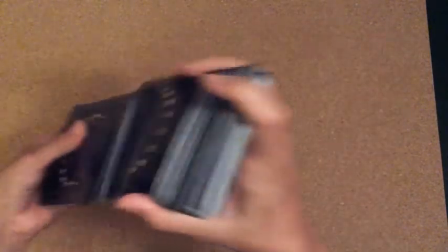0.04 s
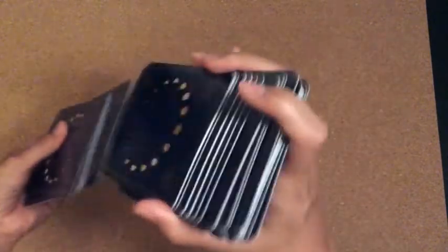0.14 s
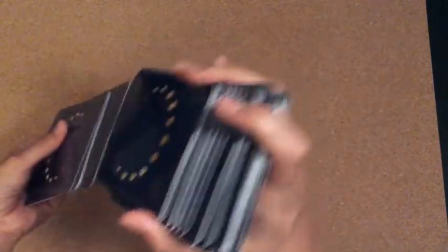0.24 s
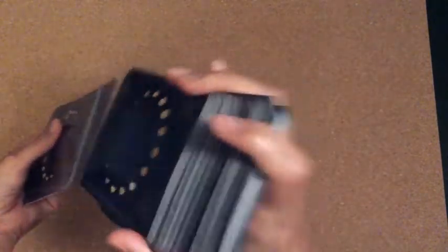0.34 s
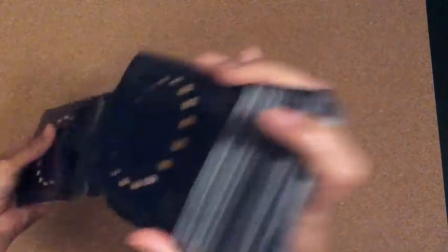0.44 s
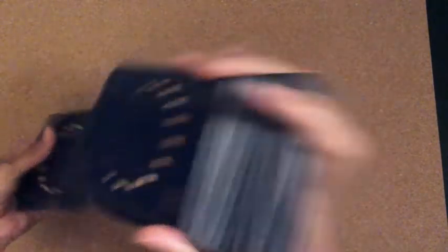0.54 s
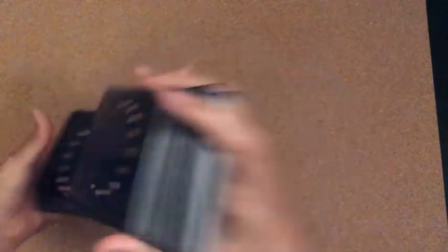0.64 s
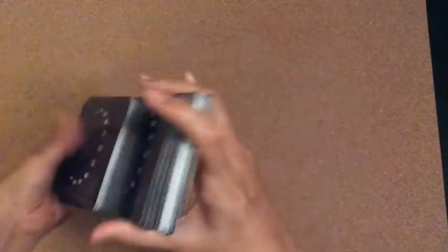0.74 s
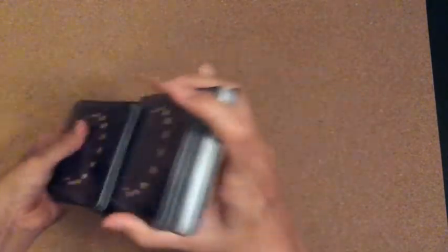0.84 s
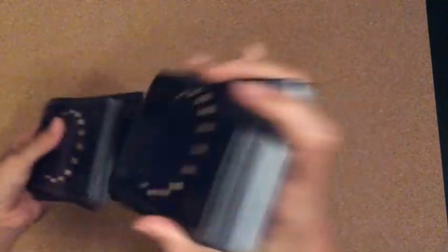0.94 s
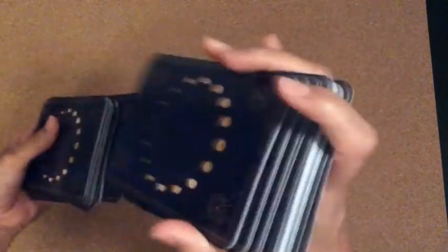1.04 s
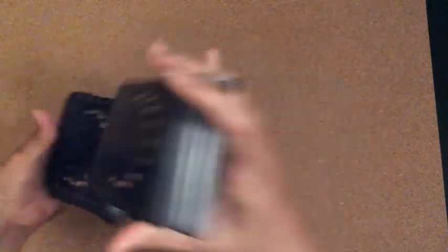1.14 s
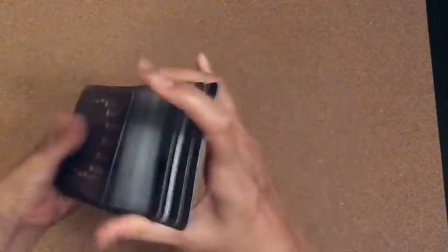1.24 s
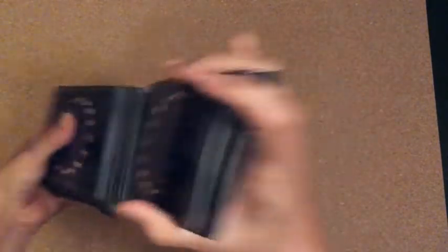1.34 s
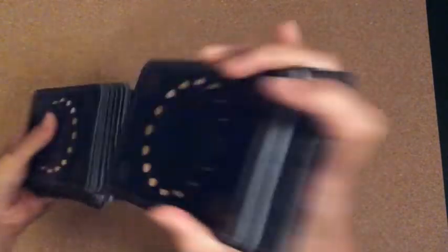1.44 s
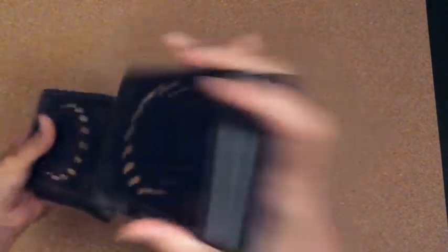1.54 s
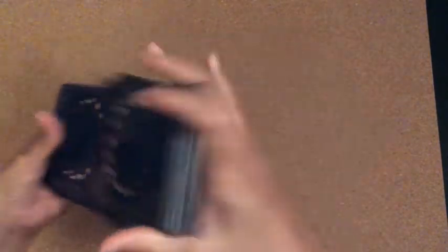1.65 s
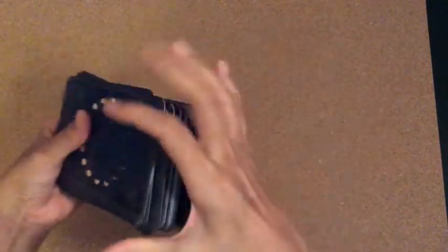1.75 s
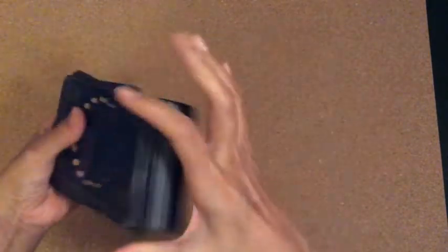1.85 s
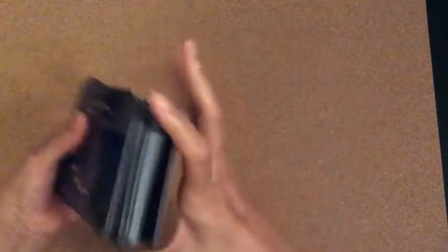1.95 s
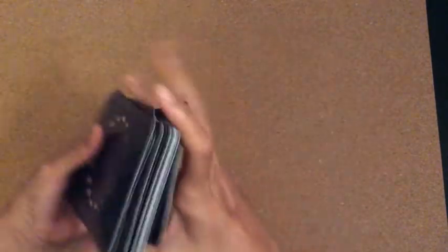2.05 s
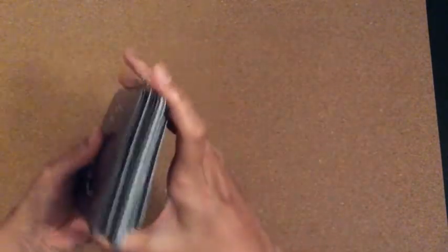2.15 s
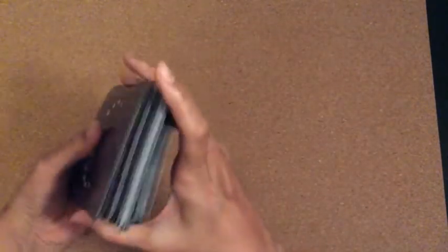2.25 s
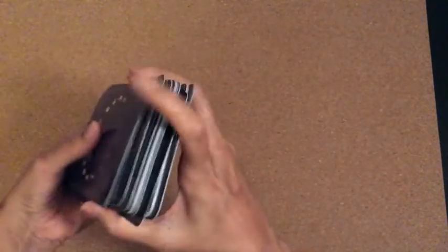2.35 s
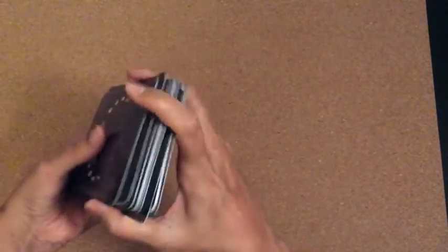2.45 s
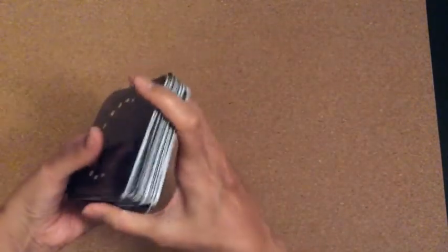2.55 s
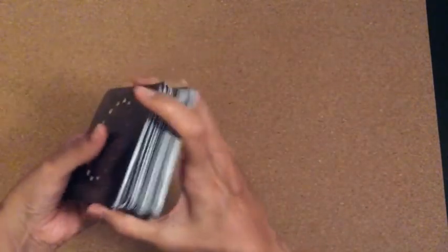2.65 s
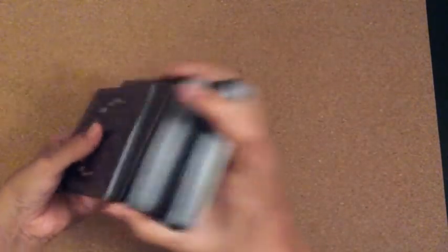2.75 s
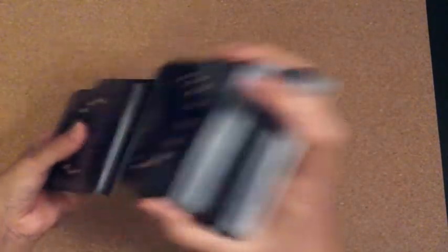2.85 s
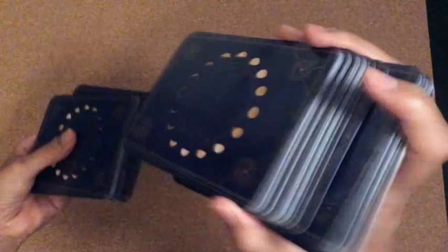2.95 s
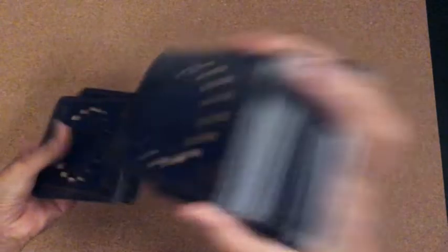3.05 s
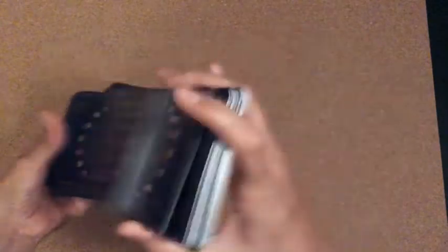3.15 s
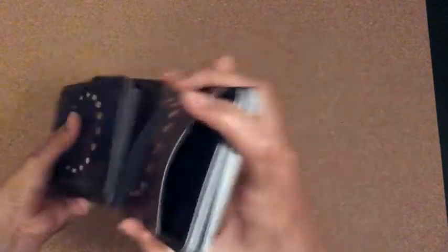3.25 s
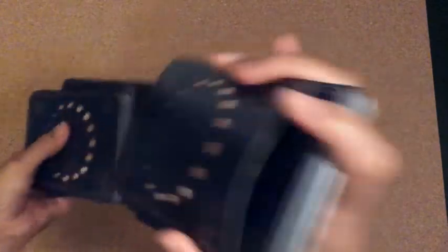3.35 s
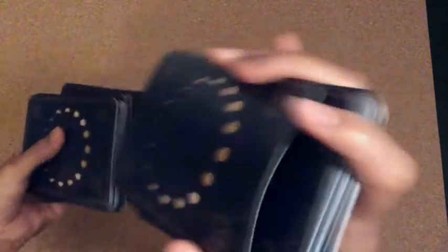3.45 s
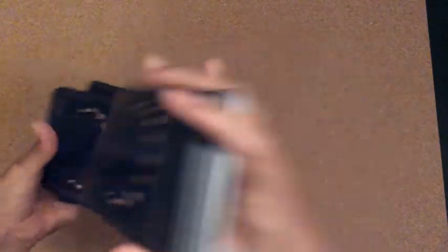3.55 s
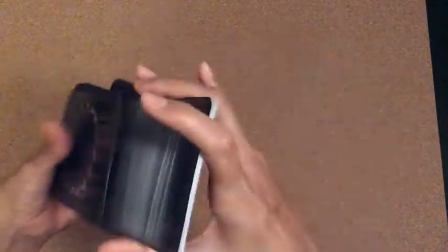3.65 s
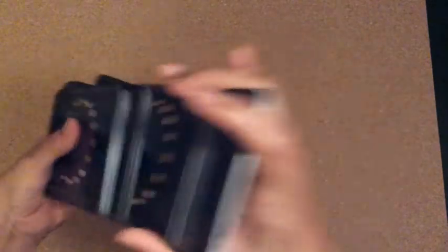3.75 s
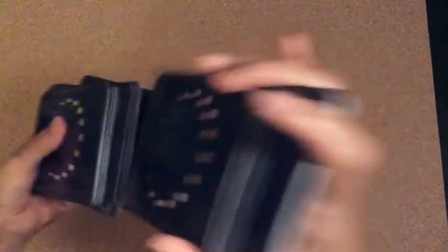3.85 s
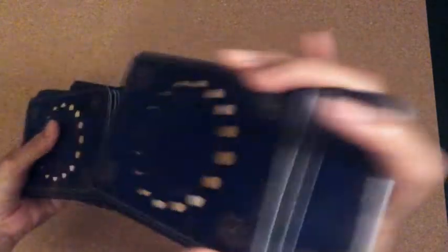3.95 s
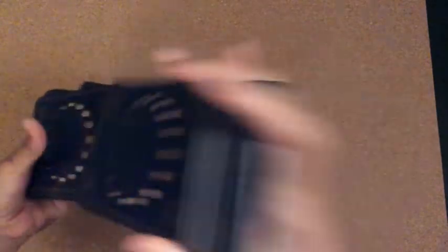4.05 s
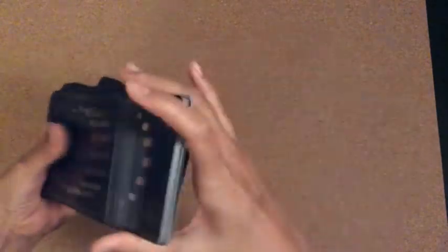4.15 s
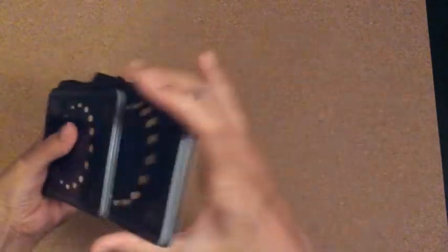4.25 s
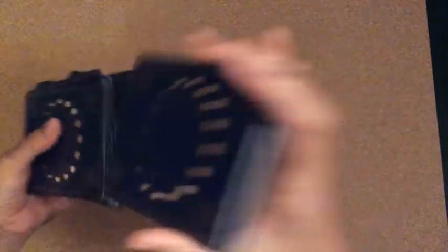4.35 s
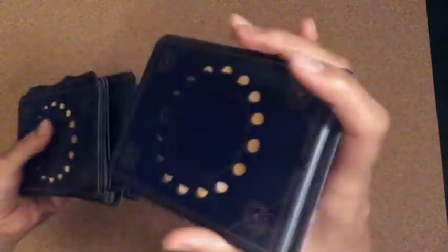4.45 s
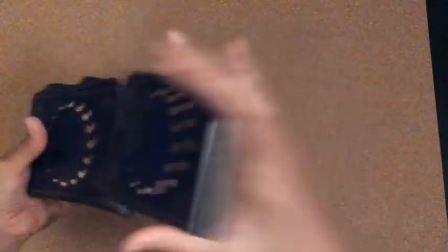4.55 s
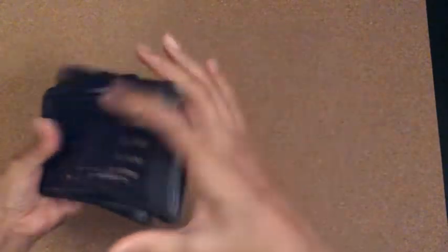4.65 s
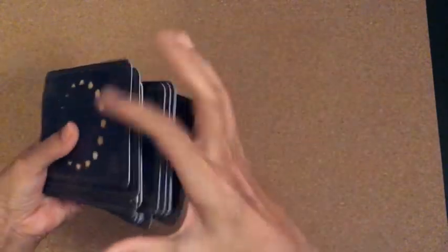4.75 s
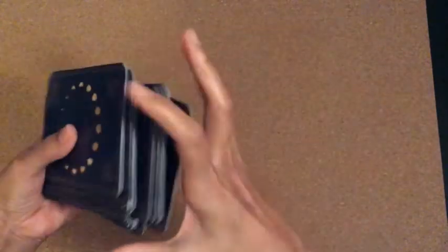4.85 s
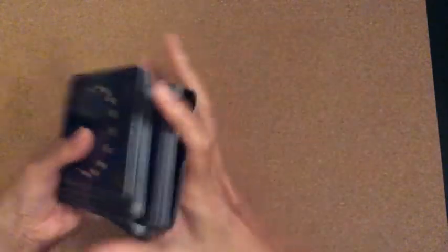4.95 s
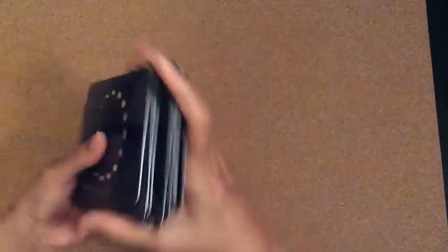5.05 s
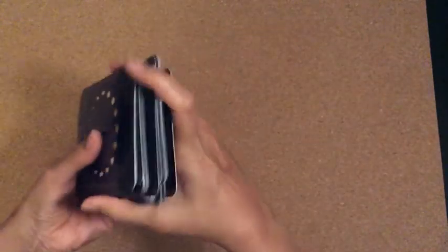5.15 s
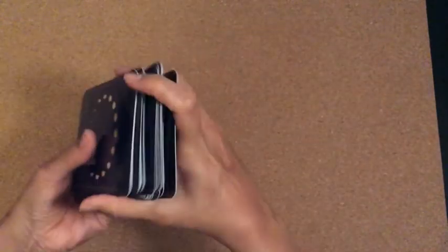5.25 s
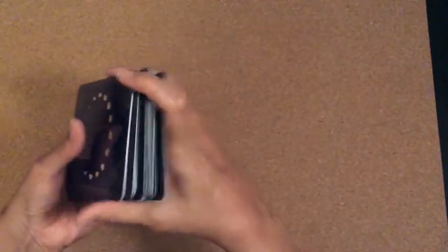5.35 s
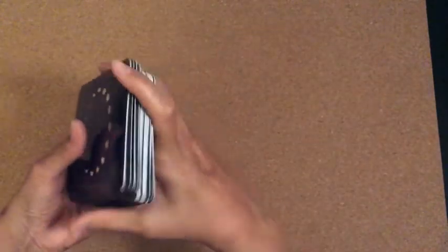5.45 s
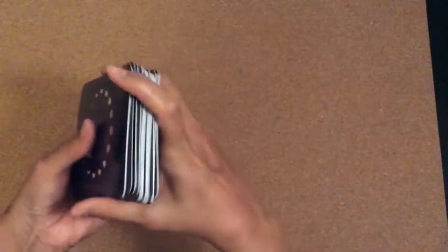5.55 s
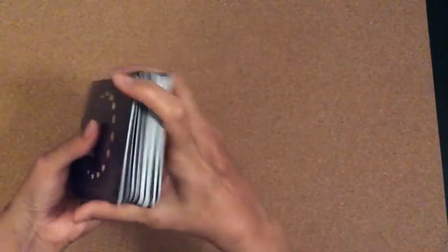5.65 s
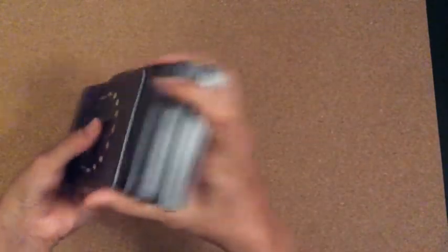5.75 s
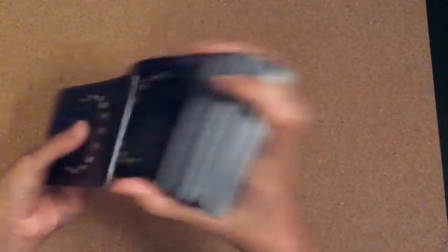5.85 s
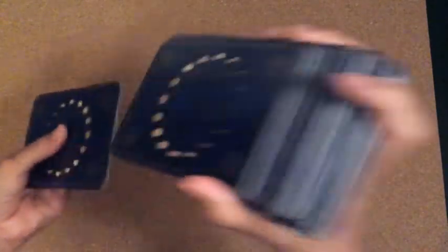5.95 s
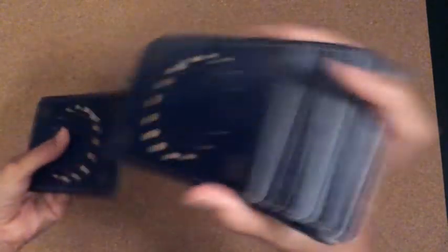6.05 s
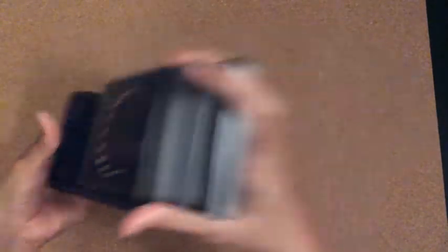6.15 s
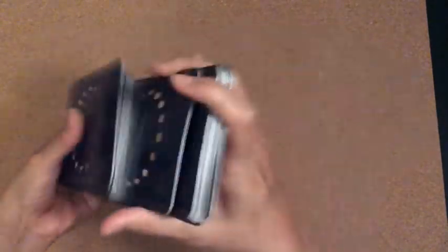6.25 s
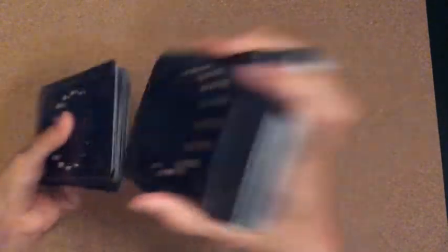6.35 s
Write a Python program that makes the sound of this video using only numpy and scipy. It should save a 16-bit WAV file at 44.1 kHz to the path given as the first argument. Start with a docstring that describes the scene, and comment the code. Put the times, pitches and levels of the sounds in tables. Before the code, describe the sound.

Two hands shuffle a deck of large glossy cards close to the microphone. Packets land in quick clusters of light slaps and edge clicks, with brief hisses as the faces slide and soft low puffs of air. The shuffling twice eases into faint rubbing and small ticks, then picks up again. The room is quiet, with a faint hiss and hum.

```python
"""Overhand card shuffle

A quiet room, a phone microphone close to two hands shuffling a deck of large glossy cards.
Packets slap and click edge on edge, their faces slide past each other with a hiss, and air
squeezed out between closing packets reaches the microphone as soft low pushes.
The walls answer briefly; under it all lie room tone and a faint mains hum."""
import sys
import numpy as np
from scipy import signal
from scipy.fft import rfft, irfft, next_fast_len
from scipy.io import wavfile
from scipy.ndimage import uniform_filter1d, map_coordinates

SR = 44100
rng = np.random.default_rng(int(sys.argv[2]) if len(sys.argv) > 2 else 0)


def store_wav(level_fs):
    """Save 16-bit WAV to argv[1]."""
    pcm = np.round(np.clip(np.atleast_2d(level_fs), -1, 1) * 32767)
    wavfile.write(sys.argv[1], SR, pcm.T.astype(np.int16))


N = 281799

# card contacts: (time [s], ring level [dB], ring [Hz], deck knock [dB re ring], edge click [dB re ring])
CONTACTS = [(0.028, -54.5, 5260, -7.5, -9), (0.067, -58, 5260, -34, -16), (0.374, -34.5, 2670, -4.5, -3),
            (0.7015, -31.5, 3930, -7.5, 2), (0.752, -35, 4100, -8.5, -23), (0.7587, -32.5, 2480, -12.5, -8),
            (0.773, -33.5, 2670, -23, 0), (0.778, -36, 2600, -26, -8), (0.7924, -38, 4500, -15, -2),
            (0.8038, -35.5, 4220, -11, 2), (0.8639, -48, 8200, -29, 13.5), (0.8672, -33, 1800, -14.5, 1),
            (0.8886, -48, 1040, -6, -3), (1.118, -63, 900, -3, -21), (1.1815, -56, 2680, 2, -5),
            (1.191, -42.5, 4560, -17, -6), (1.256, -36, 2620, -9.5, -18.5),
            (1.2624, -38, 2700, -12.5, -1.5), (1.2978, -30.5, 2050, -10.5, -1),
            (1.3585, -44, 2720, -13, -2), (1.393, -52.5, 1340, -6.5, 2.5), (1.608, -51, 4040, -5, 2.5),
            (1.6099, -25, 2580, -27.5, -4.5), (1.708, -47, 8100, -11.5, 2.5), (1.7289, -50.5, 970, -1, -1),
            (1.7659, -57, 1970, -10, -15), (1.799, -59, 2760, -11, 2), (2.0065, -68.5, 920, 6.5, 1),
            (2.0654, -61, 890, -19, 5.5), (2.3993, -57, 9000, -16, -9), (2.4754, -49, 2720, -30, -2),
            (2.4925, -51.5, 3870, -18, -3), (2.662, -35, 7260, -29, -6.5), (2.8937, -37.5, 1430, 0, -12.5),
            (3.0256, -68.5, 2450, -9.5, -4), (3.07, -64, 3420, -5, 7), (3.0855, -66, 4500, -23, 3),
            (3.1484, -40.5, 830, 0, 10.5), (3.1932, -44.5, 1660, 0, 7.5), (3.215, -38.5, 1650, -11, -4),
            (3.2228, -40, 1340, -6, -2), (3.269, -36, 3880, -6.5, 0), (3.2711, -35.5, 1160, -2, -1.5),
            (3.2789, -29, 3160, -31, -6.5), (3.2832, -29.5, 1630, -10.5, -20), (3.5963, -48, 2020, -6, 1.5),
            (3.607, -50.5, 2760, -3, 5), (3.648, -30, 3640, -11.5, -3), (3.682, -43, 1600, -10, 1),
            (3.7096, -56, 820, -1, -4), (3.8545, -48.5, 2510, -11, -4), (3.964, -58.5, 3500, -25, -6),
            (4.0886, -43, 5700, -23, 7), (4.1778, -43, 5070, -15.5, -2.5), (4.316, -55.5, 1920, 4.5, 4),
            (4.576, -31.5, 1860, -8.5, -5), (4.584, -43.5, 780, -14, -6), (4.6469, -43.5, 2300, -29, -4),
            (4.667, -47.5, 2170, -9, -1), (4.675, -38.5, 2400, -13, 1), (4.7592, -54, 3800, -15, -0.5),
            (4.7644, -51, 3800, -14, 0.5), (4.7793, -53, 1123, -1.5, 1), (4.9922, -59, 1060, -17, -5),
            (5.019, -58.5, 1140, -20, -18), (5.0975, -58.5, 1120, -24, 8), (5.216, -57, 3330, -20, -4.5),
            (5.241, -52.5, 654, -16, -18), (5.3934, -55, 5500, -20, 0.5), (5.4241, -54, 1000, -19, -0.5),
            (5.662, -53.5, 2900, -26, 3), (5.9089, -46.5, 2700, -3.5, -0.5), (6.049, -67, 2370, -17, 0),
            (6.1099, -60.5, 1900, -7, -5), (6.179, -49.5, 3980, -8, 2), (6.1926, -35.5, 6500, -19, 1),
            (6.2057, -33, 2170, -7, -10), (6.249, -41, 1820, -12, -14), (6.2587, -43, 1130, -4.5, -2),
            (6.307, -43.5, 814, -5.5, 1.5), (6.321, -44.5, 2240, -4, -9), (6.3524, -39, 980, -3.5, -4)]
# resonances of the hollow of deck and palms: (centre [Hz], width [Hz], gain [dB])
DECK_MODES = [(225, 100, -9), (435, 55, 0), (650, 100, -6), (920, 80, -4), (1230, 150, -10)]


def amp(db):
    return 10 ** (np.asarray(db) / 20)


def unit_rms(x, span=slice(None)):
    """x scaled to an rms of one within span."""
    return x / np.sqrt(np.mean(x[span] ** 2) + 1e-20)


def along(points, hz):
    """Interpolate (frequency [Hz], value) points on a log frequency axis."""
    freqs, values = np.transpose(points)
    return np.interp(np.log(hz + 1), np.log(freqs + 1), values)


def wobble(rate):
    """A smooth random curve, rate knots a second."""
    knots = rng.standard_normal(int(N * rate / SR) + 4)
    return map_coordinates(knots, [np.arange(N) * rate / SR])


def filtered(x, response):
    """x through a complex response given as a function of frequency."""
    n = x.shape[-1]
    size = next_fast_len(2 * n)
    return irfft(rfft(x, size) * response(np.fft.rfftfreq(size, 1 / SR)), size)[..., :n]


def resonances(modes, hz):
    """Causal response of (centre [Hz], width [Hz], gain [dB]) modes, alternating in sign."""
    return sum((-1) ** k * amp(db) * 1j * hz * width / (centre ** 2 - hz ** 2 + 1j * hz * width + 1e-9)
               for k, (centre, width, db) in enumerate(modes))


def patchy_noise(depth_db):
    """White noise whose gain drifts in patches of time and frequency."""
    spectrum = signal.stft(rng.standard_normal(N + 512), nperseg=256)[2]
    patches = uniform_filter1d(rng.standard_normal(spectrum.shape), size=9, axis=0)
    patches = uniform_filter1d(patches, size=7, axis=1)
    return signal.istft(spectrum * amp(depth_db * unit_rms(patches)), nperseg=256)[1][:N]


def swells(rows):
    """Gain of (time [s], hold [s], level [dB], 20 dB rise [s], 20 dB fall [s]) swells, added in power."""
    t, power = np.arange(N) / SR, np.zeros(N)
    for at, hold, db, rise, fall in rows:
        near = slice(max(round((at - 3 * rise) * SR), 0), round((at + hold + 3 * fall) * SR))
        drop_db = 20 * np.maximum((at - t[near]) / rise, (t[near] - at - hold) / fall).clip(0)
        power[near] += amp(db - drop_db) ** 2
    return np.sqrt(power)


def room_tone(air_db=-63):
    """The bed of the room: steady hiss over a low rumble that wavers, and a faint unsteady mains hum."""
    # room tone and microphone hiss: (frequency [Hz], relative density [dB])
    air_spectrum = [(4.7, -4), (8.0, 16.5), (24, -2.5), (66, -8), (97, -13), (358, -17), (794, -26.5),
                    (2940, -30), (8710, -35), (14500, -34.5), (16500, -75)]
    # mains hum in the room: (frequency [Hz], rms level [dB])
    hum_partials = [(49.5, -74.5), (150, -85.5)]
    noise, t = rng.standard_normal(N), np.arange(N) / SR
    rumble = filtered(noise, lambda hz: hz < 150)
    waver = rumble * (amp(1.4 * wobble(2.86)) - 1)
    air = filtered(noise + waver, lambda hz: amp(along(air_spectrum, hz)))
    hum = np.zeros(N)
    for hz, db in hum_partials:
        peak = np.sqrt(2) * amp(db + 2.9 * wobble(12))
        hum += peak * np.sin(2 * np.pi * hz * t + 0.59 * wobble(3.4))
    return amp(air_db) * unit_rms(air) + hum


def sliding_faces(settle_db=-8, settle_rise_s=0.0075, settle_fall_s=0.026):
    """Card faces rub: a grainy hiss, and a duller rustle through the hollow of the deck."""
    # strokes of face on face:
    # (time at full strength [s], hold [s], hiss [dB], rise [s], fall [s], rustle [dB re hiss])
    strokes = [(0.001, 0.063, -58.5, 0.13, 0.11, -12), (0.335, 0.014, -63, 0.06, 0.11, 2),
               (0.669, 0.018, -69, 0.068, .02, 4), (0.372, .003, -61.5, 0.0054, .1, 6.5),
               (0.705, 0.0031, -36.5, .004, .09, -16), (0.757, 0.029, -42.5, 0.072, 0.069, -15),
               (0.863, .004, -46, 0.0087, 0.062, -8.5), (1.055, 0.12, -76.5, 0.07, 0.061, -9),
               (1.186, 0.083, -46.5, 0.013, 0.024, -18), (1.302, 0.039, -51, 0.043, 0.095, -12.5),
               (1.609, 0.00417, -45, .006, 0.015, -1), (1.643, .02, -54, .05, 0.078, -16),
               (1.707, 0.0087, -46, 0.017, .022, -17), (1.767, 0.04, -69, .1, 0.032, -6),
               (1.997, 0.098, -64.5, .03, 0.13, -12), (2.215, 0.044, -63.5, 0.077, 0.31, -14.5),
               (2.445, 0.057, -56.5, 0.097, 0.028, -14.5), (2.635, 0.043, -58.5, 0.13, 0.15, -10.5),
               (2.796, 0.021, -58.5, 0.098, 0.16, -17), (2.893, .003, -58, 0.058, 0.0082, -4),
               (3.071, 0.01, -60, 0.0068, 0.023, -14), (3.149, 0.0037, -41.5, 0.0046, 0.12, -16),
               (3.191, 0.029, -47.5, 0.065, 0.025, -9.5), (3.268, 0.0087, -47, 0.009, 0.025, -1),
               (3.6, 0.034, -52, 0.037, .05, -11.5), (3.646, 0.0029, -43.5, 0.024, 0.066, -12.5),
               (3.758, 0.053, -61, 0.11, 0.049, -12), (3.854, 0.0034, -59, 0.017, 0.013, -0.5),
               (4.093, 0.0049, -52, 0.0045, 0.086, -12.5), (4.173, 0.017, -49.5, .055, 0.022, -13.5),
               (4.293, .04, -57.5, 0.12, .03, -9), (4.574, .004, -51.5, 0.0032, 0.13, -2),
               (4.655, 0.025, -56, 0.039, 0.063, -10), (4.76, 0.027, -67, .02, .04, -10),
               (4.927, 0.014, -65.5, 0.028, 0.068, -3), (5, 0.019, -64.5, 0.036, .13, -11),
               (5.092, 0.011, -64.5, 0.052, 0.026, -11), (5.161, 0.018, -63.5, .06, 0.11, -14),
               (5.232, 0.02, -61, 0.076, 0.07, -4), (5.368, 0.072, -59, 0.036, 0.033, -10),
               (5.49, 0.017, -67.5, .05, 0.44, -9.5), (5.655, 0.02, -52, 0.057, 0.031, -12),
               (5.773, 0.08, -55.5, 0.12, 0.069, -16), (5.903, 0.0036, -70, 0.04, 0.069, 2),
               (6.13, 0.056, -65.5, .03, 0.054, -12), (6.187, 0.035, -40.5, 0.0099, 0.067, -10.5),
               (6.31, 0.034, -50.5, .015, 0.027, -2)]
    hiss_gain = swells([row[:-1] for row in strokes])
    rustle_gain = swells([(at, hold, db + rustle_db, rise, fall)
                          for at, hold, db, rise, fall, rustle_db in strokes])
    # the deck also rustles as it settles after a knock
    settle_gain = swells([(at + settle_rise_s, 0, db + knock_db + settle_db, settle_rise_s, settle_fall_s)
                          for at, db, _, knock_db, _ in CONTACTS])
    # hiss of the glossy faces: (frequency [Hz], relative density [dB])
    hiss_spectrum = [(900, -28), (1500, -5.5), (2460, -1), (5300, -3), (7800, -2.5), (9300, -3.5),
                     (10800, -11.5), (14000, -9.5), (15500, -14.5)]
    stick_slip = wobble(90)
    grain = patchy_noise(depth_db=1.5) * amp(1.86 * stick_slip + 1.6 * wobble(570))
    hiss = filtered(grain, lambda hz: amp(along(hiss_spectrum, hz)))
    rub = patchy_noise(depth_db=5.8) * amp(1.4 * stick_slip)
    # a 600 Hz high-pass: rubbing stirs the upper hollows most
    rustle = filtered(rub, lambda hz: resonances(DECK_MODES, hz) * 1j * hz / (600 + 1j * hz))
    return hiss_gain * unit_rms(hiss) + (rustle_gain + settle_gain) * unit_rms(rustle)


def packet_taps(bend_hz=6000):
    """Each contact is a quick run of card edges landing: it rings the card, clicks, and knocks the deck."""
    # resonances of the card stock: (centre [Hz], width [Hz], gain [dB])
    stock_modes = [(1807, 140, -3), (2570, 410, 5), (3190, 2100, -0.5), (4360, 2000, 2), (5440, 1600, -6.5)]
    # click of a card edge: (frequency [Hz], relative density [dB])
    click_spectrum = [(2500, -8.5), (5000, -4.5), (8000, -2.5), (10500, -10), (15000, -13)]
    out, t = np.zeros(N + SR), np.arange(3000) / SR
    attack, knock_attack = slice(90), slice(300)  # levels are set over the first 2 ms and 7 ms
    leading_edge = np.exp(-((t - 0.0004) / 0.00002) ** 2)  # lands as one hard blow
    for at, db, ring_hz, knock_db, click_db in CONTACTS:
        t60 = 0.027 * amp(0.071 * (db + 41.5))  # harder contacts land more edges and last longer
        fade = amp(-60 * t / t60) * (1 - np.exp(-t / 0.000078))
        edges = rng.standard_normal((3, len(t)))
        force = amp(1.47 * rng.standard_normal(len(t)))  # some edges strike harder than others
        ring_drive, click_drive, knock_drive = edges * force * fade + [[5], [9], [14]] * leading_edge
        own_mode = [(ring_hz, 0.2 * ring_hz, 6)]
        ring = filtered(ring_drive, lambda hz: (resonances(own_mode, hz) + resonances(stock_modes, hz))
                        / (1 + 1j * hz / bend_hz) ** 2)  # the card bends on contact, dulling its ring
        click = filtered(click_drive, lambda hz: amp(along(click_spectrum, hz)))
        knock = filtered(knock_drive, lambda hz: resonances(DECK_MODES, hz))
        tap = (unit_rms(ring, attack) + amp(click_db) * unit_rms(click, attack)
               + amp(knock_db) * unit_rms(knock, knock_attack))
        start = round(at * SR) - 20
        out[start:start + len(t)] += amp(db) * tap
    return out[:N]


def air_pushes():
    """Closing packets squeeze air at the microphone: a brief swing of pressure under a smooth swell."""
    # puffs of air: (time [s], swell peak [dB], frequency [Hz])
    puffs = [(0.034, -49.5, 73.6), (0.375, -47, 87), (0.701, -45, 94.5), (0.776, -50, 111),
             (0.805, -44, 129), (1.191, -47, 93), (1.263, -38, 133), (1.306, -43.5, 70.6), (1.623, -47, 84),
             (1.729, -41, 136), (1.814, -55.5, 65), (3.154, -34.5, 124), (3.207, -43, 113),
             (3.222, -39, 144), (3.267, -40, 108), (3.3, -46, 156), (3.606, -43, 144), (3.652, -48, 103),
             (3.684, -42, 121), (3.855, -50.5, 84.5), (4.095, -56, 112), (4.343, -53, 65.3),
             (4.59, -43.5, 85), (4.66, -43, 69), (4.679, -45.5, 82), (4.78, -38.5, 69), (5.808, -52.5, 82),
             (5.858, -49.5, 103), (5.909, -48, 93), (6.206, -45, 104), (6.249, -45, 84), (6.277, -48, 77),
             (6.322, -42.5, 123)]
    lead = 2000  # samples ahead of each puff's centre
    out, t = np.zeros(N + SR), np.arange(-lead, lead) / SR
    for at, db, hz in puffs:
        swell = np.exp(-(t * hz / 0.29) ** 2)
        swing = swell * np.cos(2 * np.pi * hz * t + rng.uniform(0, 2 * np.pi))
        start = round(at * SR)
        out[start:start + len(t)] += amp(db) * (swing - swing.mean())
    return out[lead:N + lead]


def wall_reflections(x):
    """The room answers after a few milliseconds, each frequency dying at its own speed."""
    # reverberation of the room: (frequency [Hz], time to fall 60 dB [s])
    decay_times = [(200, 0.25), (1500, 0.33), (3500, 0.19), (6000, 0.16), (14000, 0.14)]
    hz, t, spectrum = signal.stft(rng.standard_normal(SR // 2), SR, nperseg=256)
    decay = amp(-60 * t / along(decay_times, hz)[:, None])
    tail = signal.istft(spectrum * decay, SR, nperseg=256)[1]
    delayed = np.pad(x, (200, 0))
    return signal.fftconvolve(delayed, tail / np.linalg.norm(tail))[:N]


def scene():
    """One microphone close to the hands: the cards up front, the walls well below them."""
    cards = packet_taps() + sliding_faces()
    reflections = amp(-18) * wall_reflections(cards)
    return (cards + reflections + air_pushes() + room_tone())[None]


def record(dry):
    """The phone keeps nothing above its band limit."""
    return filtered(dry, lambda hz: hz < 15800)


dry = scene()
out = record(dry)
store_wav(out)
```